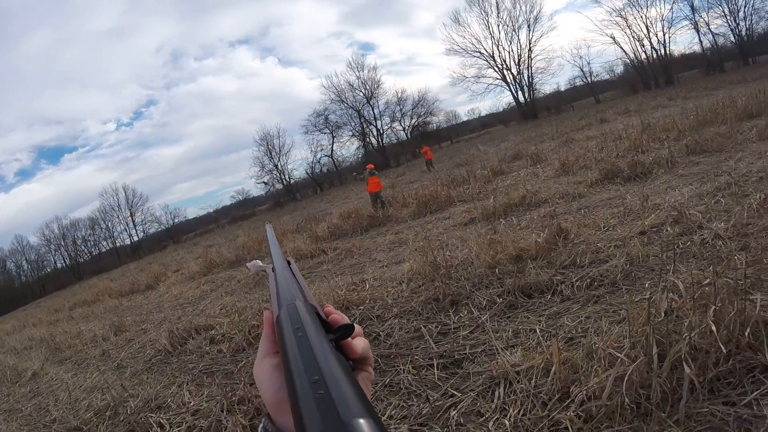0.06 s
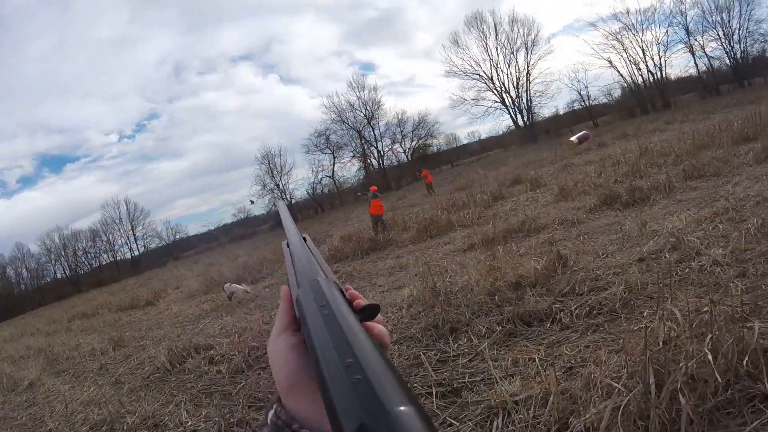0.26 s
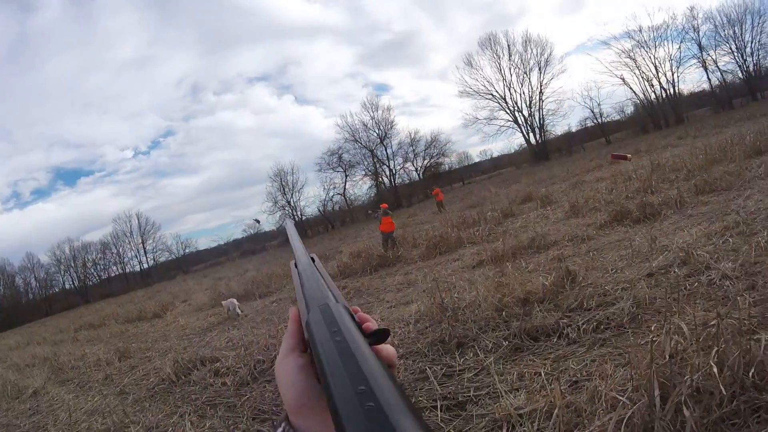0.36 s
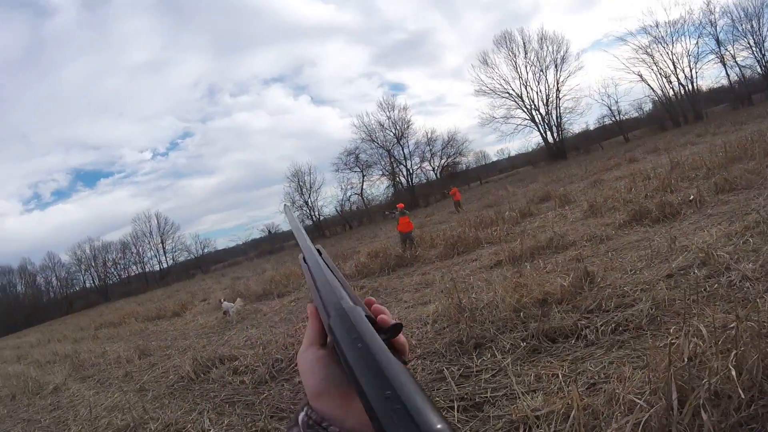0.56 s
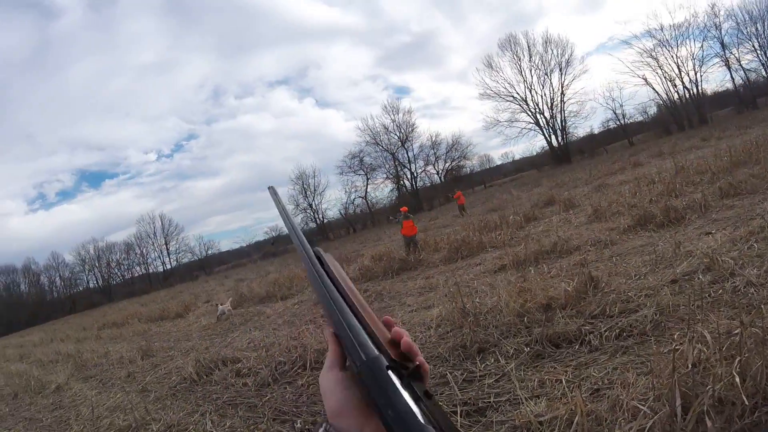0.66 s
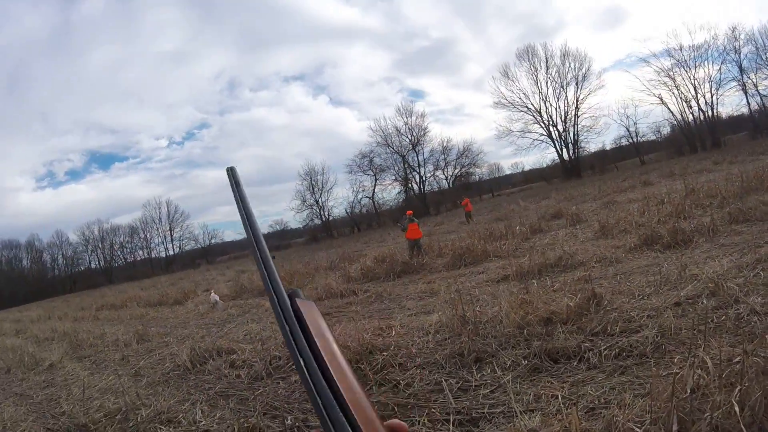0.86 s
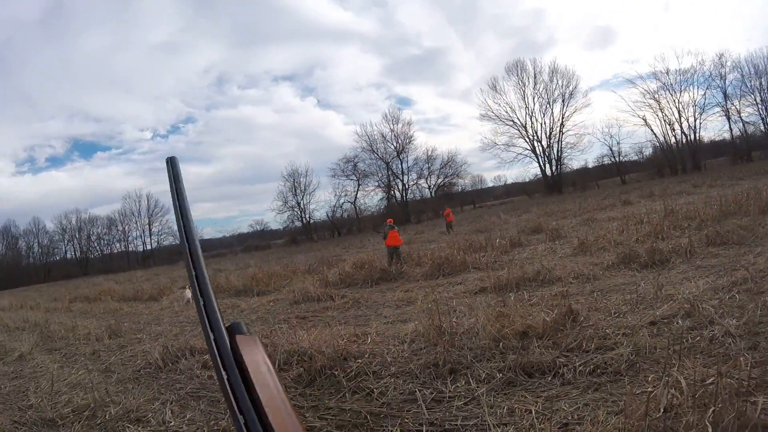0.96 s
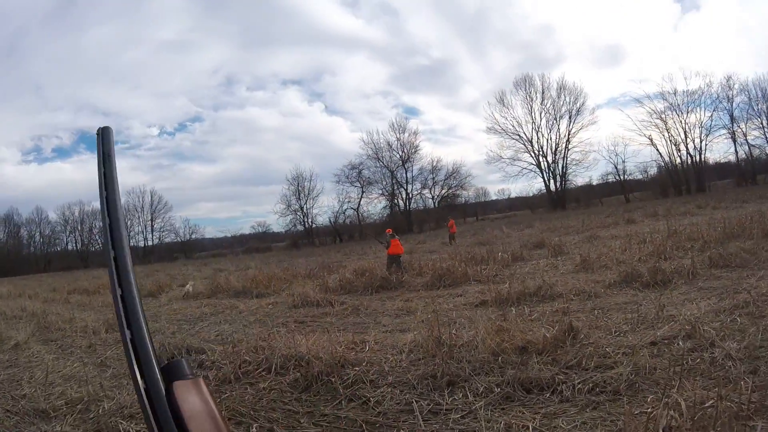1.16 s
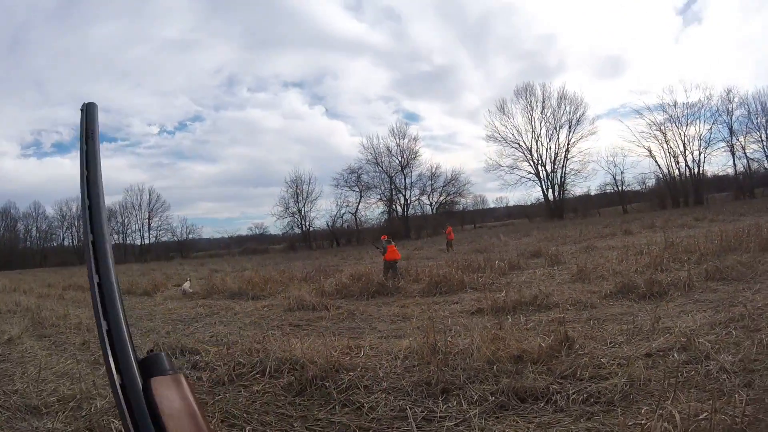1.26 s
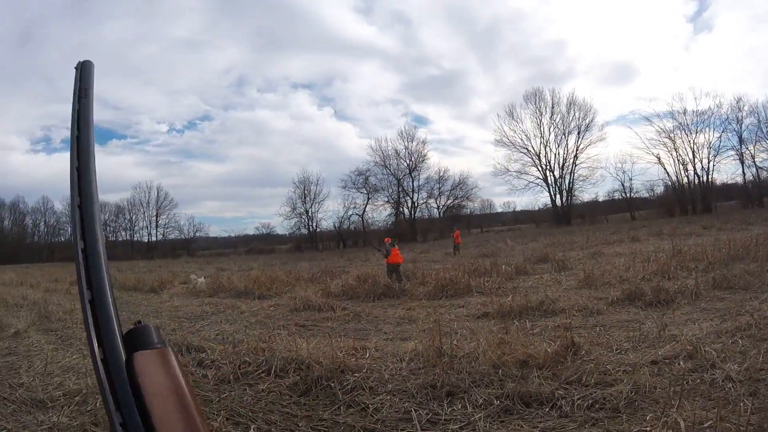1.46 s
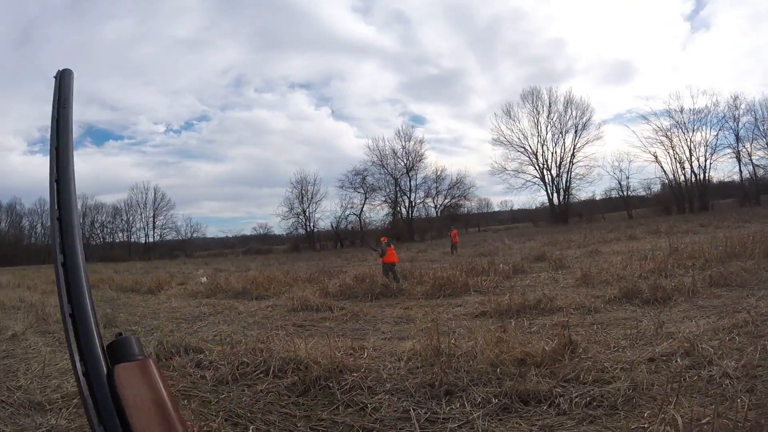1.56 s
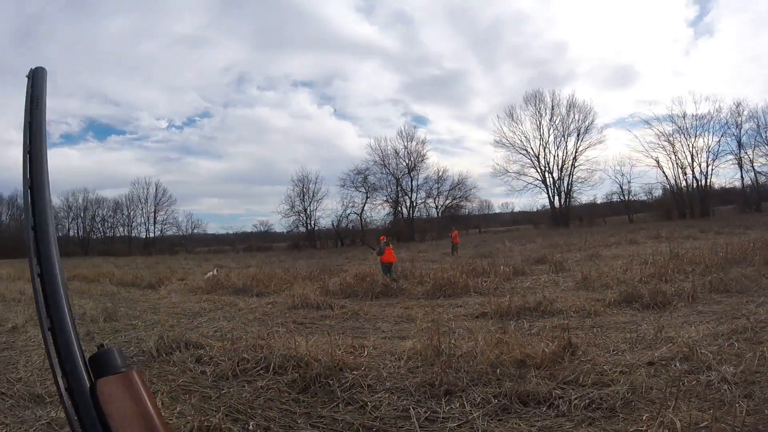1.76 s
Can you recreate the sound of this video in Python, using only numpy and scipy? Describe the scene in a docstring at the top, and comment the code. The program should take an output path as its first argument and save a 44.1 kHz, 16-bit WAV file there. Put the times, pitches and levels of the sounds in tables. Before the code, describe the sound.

A shotgun fires once, right by a microphone worn by the shooter. Its bolt clanks open and shut, and the bang echoes away across an open field. Faint gun handling clicks follow, while light wind rumbles on the microphone.

```python
"""One shotgun shot in a field

A shotgun fires once, close to a camera worn by the shooter. The gun kicks back, and its
parts slam open and shut, ringing and rattling. Grass scatters the bang and trees send it back.
Light wind buffets the microphone. The recorder turns itself down at the shot, then recovers."""
import sys
import numpy as np
from scipy import signal
from scipy.fft import rfft, irfft
from scipy.io import wavfile

SR = 44100
rng = np.random.default_rng(int(sys.argv[2]) if len(sys.argv) > 2 else 0)


def unload_audio(sound):
    """Save the sound as a 16-bit wav file, at the path given as the first command line argument."""
    columns = np.transpose(np.atleast_2d(sound))
    # keep every value between -1 and 1, then stretch to whole-number steps
    steps = np.round(np.clip(columns, -1, 1) * 32767)
    wavfile.write(sys.argv[1], SR, steps.astype(np.int16))


N = 79380
T = np.arange(N) / SR

# Wind strength over time: time_s, level_db
GUSTS = [(0, -28.5), (.11, -33), (.15, -41.5), (.3, -35.5), (.41, -33), (.47, -44.5), (.85, -47.5),
         (1.12, -47.5), (1.4, -49.5), (1.8, -52)]
# Tone (how strong each pitch is) of wind on the microphone: pitch_hz, level_db
WIND_TONE = [(10, -9), (25, 3), (38, -2), (55, -9.5), (90, -26.5), (200, -44), (600, -75.5)]
# Tone of the field's steady hush: pitch_hz, level_db
HUSH_TONE = [(53, -30.5), (90, -5), (180, -8.5), (478, -16), (581, -17), (676, -18), (1140, -21),
             (1380, -21.5), (2950, -26.5), (3430, -28.5), (12600, -44.5), (16000, -61.5)]
# Knocks of the hammer, the sliding bolt opening and closing, and handling:
# start_s, level_db, rattle_fade_s, brighten_db_per_octave, contact_s
KNOCKS = [(0.2057, -18, 0.0012, 1, 0.00069), (.21353, 4.5, .001, -1, 0.00027), (.2534, -6, .001, 16, .0003),
          (.25708, 24.5, .0012, 1.5, 0.00058), (.25883, 9, .0007, -6, 0.00014),
          (0.2713, -0.5, .004, 2, 0.002), (0.3636, 2.5, 0.0054, 2, 0.001),
          (0.37, -2.5, 0.004, -1.5, 0.0021), (.99, -31, .003, 1, 0.0018), (1.02, -27, 0.0035, -1.5, 0.0016),
          (1.039, -17, 0.006, -1.5, 0.00083), (1.0429, -24, .002, 0.5, 0.0011),
          (1.061, -31.5, 0.005, 1.5, .002), (1.658, -33.5, .005, -0.5, 0.0025)]
# Notes that the gun and camera mount ring with: pitch_hz, level_db, ring_s (time to fade 60 dB)
BODY_NOTES = [(1040, -14.5, 0.01), (1194, -5.5, 0.011), (1700, -7, .01), (2400, -11, 0.019),
              (3408, 3, 0.012), (3650, -16.5, .0073), (4770, -9, .007), (6200, -15.5, 0.0047),
              (8100, -16, 0.0085), (10100, -22.5, .0046)]
# Tone of rattling parts: pitch_hz, level_db
RATTLE_TONE = [(60, -12), (300, -8), (650, -12.5), (1150, 1.5), (2000, -6), (2800, -4), (3500, 8),
               (4400, -9), (6300, -4), (10000, -13.5), (15000, -28)]
# Close reflections off shooter, gun and ground: delay_s, level_db
BOUNCES = [(.00186, -3), (.00327, -15.5)]
# Tone of the bang: pitch_hz, level_db
BLAST_TONE = [(40, -13), (150, -9), (500, -13), (800, -13.5), (1600, -1), (2400, 3), (3000, -5.5),
              (3550, 9), (4400, -9.5), (7000, -16), (10000, -16.5), (15000, -32)]
# Tone of the bang scattered by grass: pitch_hz, level_db
GRASS_TONE = [(60, -9.5), (250, -9.5), (550, -17.5), (900, -11), (1700, -8), (2900, -10), (3500, 4),
              (4400, -17.5), (7500, -22), (11000, -30), (15000, -40.5)]
# Echoes from groups of trees: start_s, level_db, rise_s, fade_s, dull_db_per_khz
TREE_ECHOES = [(0.489, -37, 0.0047, 0.051, 0.5), (0.514, -39.5, 0.021, 0.015, -1),
               (.585, -37.5, 0.0018, 0.0031, 7), (0.595, -37, .002, 0.0058, 2),
               (.638, -45, 0.015, 0.0062, 4), (.694, -37.5, 0.0026, 0.011, 4),
               (.735, -50.5, .012, 0.0191, 3.5), (0.786, -39.5, 0.0028, 0.012, 6),
               (0.871, -47.5, .012, .02, 3), (.942, -45, 0.0033, 0.0087, 4.5)]
# Tone of those echoes: pitch_hz, level_db
ECHO_TONE = [(80, -10.5), (220, -1.5), (400, -11), (700, 1.5), (1300, -0.5), (1900, -0.5), (2900, -4.5),
             (3550, 8), (4300, -22.5), (7000, -29), (14000, -71)]
# Tone of the long roll from the far woods: pitch_hz, level_db
WOODS_TONE = [(100, -8), (400, -13), (650, -0.5), (1200, -1.5), (1800, -2), (2400, -17), (3000, -13.5),
              (3550, -5.5), (4300, -45.5), (9000, -42)]
# Tone of the gun's kick: pitch_hz, level_db
THUD_TONE = [(40, -15), (130, -3.5), (330, -7.5), (700, -10.5), (1100, -5), (1650, 3), (2400, -7.5),
             (4000, -15), (8000, -23.5), (15000, -39.5)]
# Shoves to the camera: middle_s, level_db, half_width_s
JOLTS = [(0.303, -22, 0.011), (0.374, -12, 0.0081), (0.418, -31, 0.0073), (1.046, -33, 0.008)]

SHOT_S, BOLT_BACK_S = .2091, .257  # when the gun fires and when the bolt slams back


def amp(db):
    """Turns decibels into a number to multiply by."""
    return 10 ** (np.asarray(db) / 20)


def unit(x):
    """Scales a signal to an average strength (rms) of 1."""
    return x / np.sqrt(np.mean(x ** 2) + 1e-20)


def colour(x, tone, dull_db=0, bright_db=0):
    """Gives a sound a tone, made duller per kHz or brighter per octave above 1 kHz."""
    hz = np.abs(np.fft.fftfreq(N, 1 / SR)) + 1
    pitch_hz, level_db = np.transpose(tone)
    db = np.interp(np.log(hz), np.log(pitch_hz), level_db)
    db = db - dull_db * hz / 1000 + bright_db * np.log2(np.maximum(hz, 1000))
    log_gain = np.log(np.maximum(unit(amp(db)), 1e-5))
    # This makes the filter ring after a click, not before it.
    response = np.exp(np.conj(signal.hilbert(log_gain)))[:N // 2 + 1]
    return irfft(rfft(x) * response, N)


def noise(tone):
    """A steady rush with the given tone."""
    return colour(rng.standard_normal(N), tone)


def swell(start_s, rise_s, fade_s):
    """A loudness shape that climbs in a straight line, then dies away."""
    return np.clip((T - start_s) / rise_s, 0, 1) * np.exp(-np.maximum(T - start_s - rise_s, 0) / fade_s)


def burst(start_s, fade_s):
    """A dying spray of tiny clicks."""
    clicks = rng.choice([-1., 1.], N) * swell(start_s, 1 / SR, fade_s)
    return clicks / np.linalg.norm(clicks)


def delayed(x, delay_s):
    """Makes a sound start later."""
    return np.interp(T - delay_s, T, x, left=0)


def scatter(tone, dull_db=0):
    """Noise in uneven clumps, like many small reflections arriving."""
    clump_times = np.arange(0, 2, .004)
    clump_db = 2.5 * np.interp(T, clump_times, rng.standard_normal(N)[:len(clump_times)])
    return colour(unit(rng.standard_normal(N) * amp(clump_db)), tone, dull_db)


def wind():
    """Gusts rumble on the microphone over the hush of the field."""
    gust_db = np.interp(T, *np.transpose(GUSTS))
    return amp(gust_db) * unit(noise(WIND_TONE)) + amp(-59.5) * noise(HUSH_TONE)


def gun_parts():
    """Each knock makes the gun ring and rattle; the bolt leaves small rattles and a thin ping."""
    out = np.zeros(N)
    t = T[:SR // 10]
    for start_s, db, rattle_fade_s, bright_db, contact_s in KNOCKS:
        ring = sum(amp(level + bright_db * np.log2(hz) - 60 * t / ring_s) * np.cos(2 * np.pi * hz * t)
                   for hz, level, ring_s in BODY_NOTES)
        ring *= np.minimum(t / contact_s, 1)  # longer contact gives a softer start
        ring = np.pad(ring / np.linalg.norm(ring), (0, N - len(t)))
        rattle = amp(-8) * colour(burst(start_s, rattle_fade_s), RATTLE_TONE, bright_db=bright_db)
        out += amp(db) * (delayed(ring, start_s) + rattle)
    out += amp(-21.5) * scatter(RATTLE_TONE, dull_db=.6) * swell(BOLT_BACK_S, .002, .0095)
    ping_hz, ping_ring_s = 1845, .97
    ping = amp(-40 - 60 * T / ping_ring_s) * np.sin(2 * np.pi * ping_hz * T)
    return out + delayed(ping, BOLT_BACK_S)


def blast():
    """The bang: air is pushed, then sucked back, with close reflections and a crack of swirling gas."""
    push_s = .00048
    shock = (1 - T / push_s) * np.exp(-T / push_s)
    shock /= np.linalg.norm(shock)
    bounces = sum(amp(db) * delayed(shock, SHOT_S + delay_s) for delay_s, db in BOUNCES)
    crack = amp(-12) * burst(SHOT_S, fade_s=.0025)
    return -amp(15.5) * colour(delayed(shock, SHOT_S) + bounces + crack, BLAST_TONE)


def field_echoes():
    """Grass scatters the bang, trees echo it and the far woods send back a long roll."""
    near_grass = amp(-22.5) * scatter(GRASS_TONE) * swell(SHOT_S, rise_s=.003, fade_s=.03)
    far_grass = amp(-34.5) * scatter(GRASS_TONE, dull_db=1.2) * swell(SHOT_S, .03, .135)
    hedges = amp(-55.5) * scatter(ECHO_TONE, dull_db=2.7) * swell(.563, .11, .44)
    trees = sum(amp(db) * scatter(ECHO_TONE, dull_db) * swell(start_s, rise_s, fade_s)
                for start_s, db, rise_s, fade_s, dull_db in TREE_ECHOES)
    woods = amp(-51.5) * scatter(WOODS_TONE) * swell(.881, .078, .26)
    return near_grass + far_grass + hedges + trees + woods


def recoil():
    """A dull blow as the gun kicks back, just before the bolt's clank."""
    kick_s = .25562
    tap = np.zeros(N)
    tap[round(kick_s * SR)] = 1
    return amp(15.5) * colour(tap, THUD_TONE)


def camera_jolts():
    """The kick and handling shove the camera: each time a slow push, then a pull."""
    out = np.zeros(N)
    for middle_s, db, half_width_s in JOLTS:
        swing = (middle_s - T) / half_width_s
        out += amp(db) * swing * np.exp((1 - swing ** 2) / 2)
    return out


def scene():
    """Adds up all the sounds at one microphone."""
    return (blast() + recoil() + field_echoes() + gun_parts() + camera_jolts() + wind())[None]


def record(dry):
    """The recorder turns down at once when it gets loud, waits, then turns back up."""
    threshold_db, max_cut_db, hold_s, recover_db_per_s = -13, 8.5, .51, 31
    level_db = 20 * np.log10(abs(dry[0]) + 1e-9)
    wanted_cut_db = np.clip(2 * (level_db - threshold_db), 0, max_cut_db)
    held_db = np.maximum.accumulate(wanted_cut_db)
    last_peak_s = np.maximum.accumulate(np.where(wanted_cut_db >= held_db, T, 0))
    recovered_db = recover_db_per_s * np.maximum(T - last_peak_s - hold_s, 0)
    cut_db = np.maximum(held_db - recovered_db, 0)
    ceiling, soften_hz, top_hz = .84, 12530, 15800
    x = dry / amp(cut_db) / ceiling
    x = ceiling * x / (1 + x ** 4) ** .25  # squash the loudest peaks
    x = signal.lfilter(*signal.butter(2, soften_hz, fs=SR), x)  # soften the treble
    treble_cut = signal.firwin(255, top_hz, window=("kaiser", 9), fs=SR)
    return signal.oaconvolve(x, treble_cut[None], "same")


dry = scene()
out = record(dry)
unload_audio(out)
```